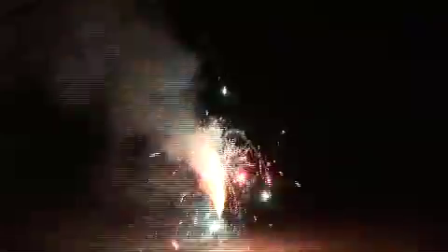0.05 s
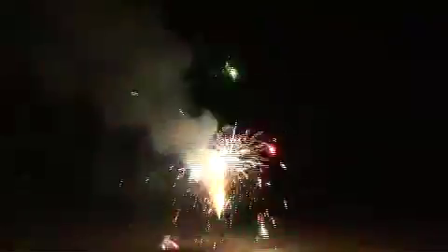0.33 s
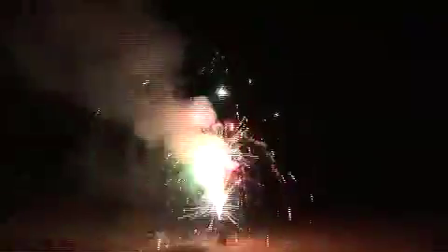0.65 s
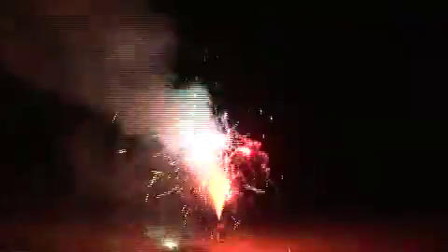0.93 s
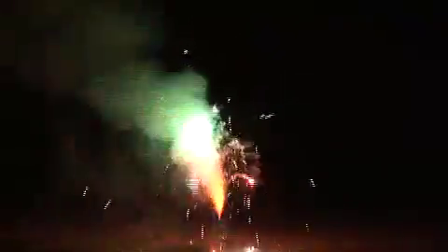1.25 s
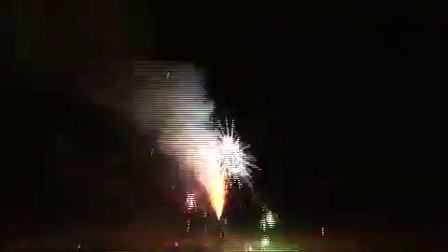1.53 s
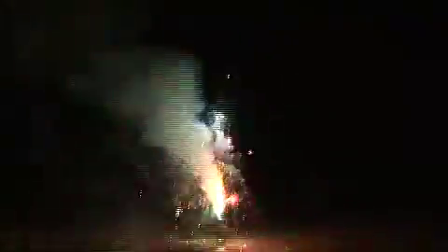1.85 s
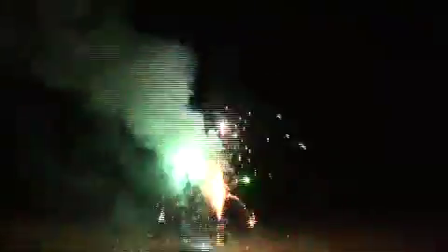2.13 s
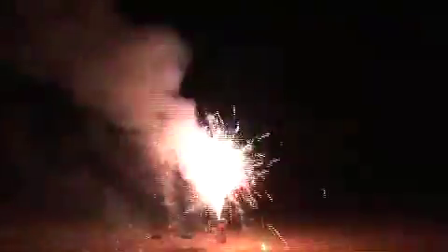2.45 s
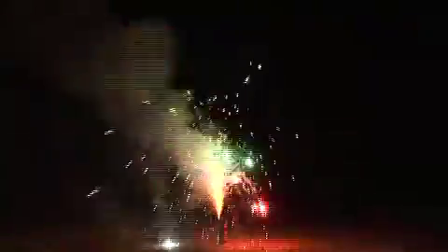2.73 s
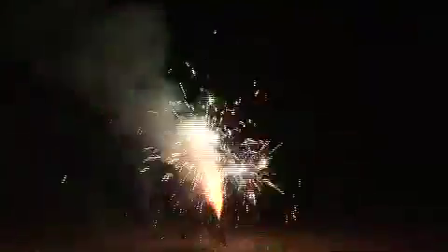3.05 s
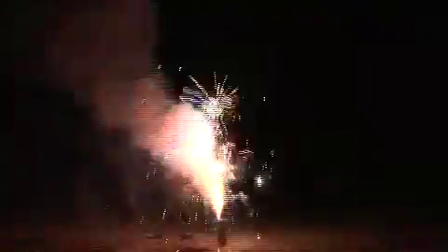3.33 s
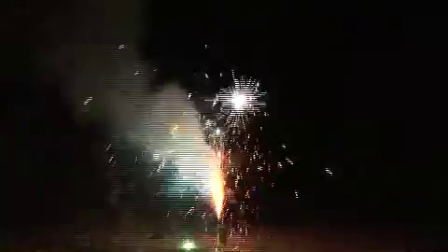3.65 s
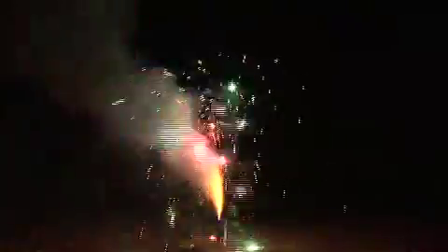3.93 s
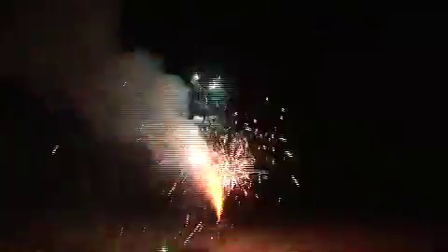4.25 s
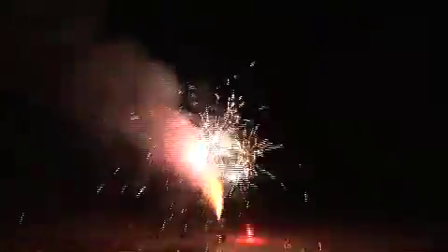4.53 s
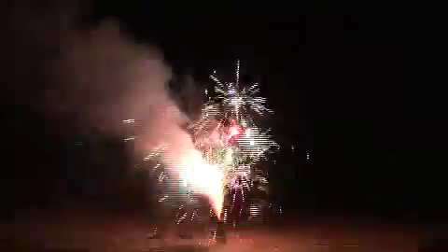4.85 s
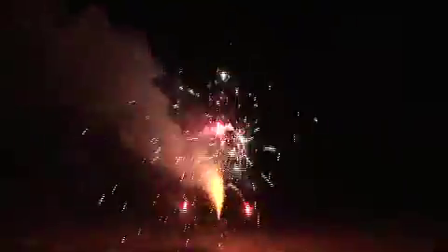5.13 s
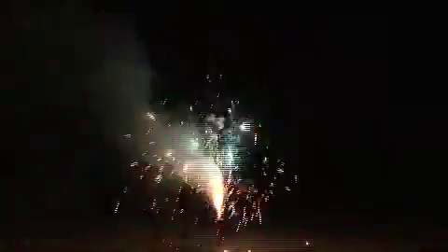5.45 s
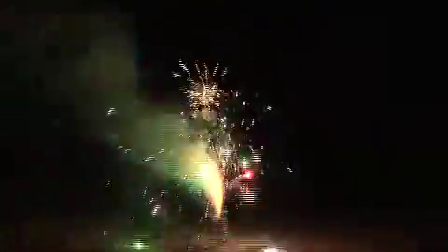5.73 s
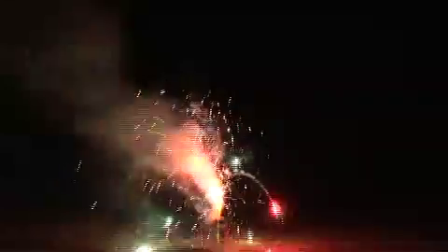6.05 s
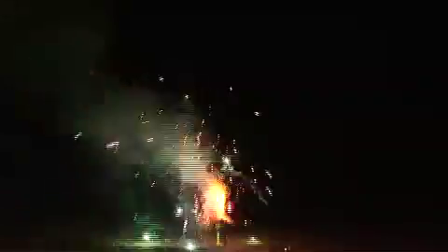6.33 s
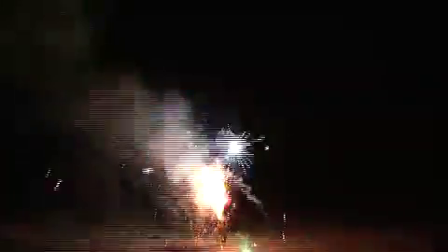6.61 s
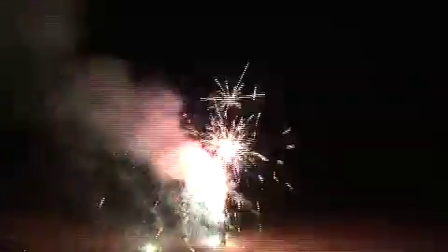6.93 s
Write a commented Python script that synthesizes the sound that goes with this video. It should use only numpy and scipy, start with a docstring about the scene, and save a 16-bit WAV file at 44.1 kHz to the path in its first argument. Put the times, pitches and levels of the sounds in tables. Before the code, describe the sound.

Dense snaps and sizzling pops spit from a hissing firework fountain outside, with a few soft thumps and a low motor hum.

```python
"""Sharp, irregular crackle over a steady hiss: a ground fountain burns outdoors at night, some metres away.
Each star thrown from the nozzle bursts as one shock and a few ms of smaller explosions,
trailed by a short bright sizzle and two faint slaps. Now and then the tube coughs out a lump
with a low thump. Underneath, a camera motor hums."""
import sys
import numpy as np
from scipy import signal
from scipy.fft import rfft, irfft
from scipy.io import wavfile
from scipy.ndimage import uniform_filter1d

SR = 44100
rng = np.random.default_rng(int(sys.argv[2]) if len(sys.argv) > 2 else 0)


def dump_mix(stems):
    """Bounce the given channels to the path in sys.argv[1] as a 16-bit WAV at rate SR."""
    frames = np.atleast_2d(stems).T  # one column per channel
    limited = np.clip(frames, -1, 1)  # hard clip at full scale
    pcm = np.round(limited * 32767).astype(np.int16)
    wavfile.write(sys.argv[1], SR, pcm)


N = 312228
TIME = np.arange(N) / SR


def stars(bright_db=1.0, half_shock_s=0.0023, crumble=1.76):
    """The lead crackle: a quick star goes off in one snap, a slow one crumbles into fragments."""
    # bursting stars: (time [s], level over 3 ms [dB], burst length [s], treble [dB])
    star_cues = [(0.0065, -29.5, 0.0017, -4), (0.042, -24.5, 0.002, 2.5), (0.066, -32, 0.0024, -7),
                 (0.1407, -23.5, 0.0039, 2), (0.2031, -23, 0.0028, 7), (0.2247, -21.5, 0.0022, -6),
                 (0.2718, -25.5, 0.0022, -2), (0.2771, -23.5, 0.0019, -7), (0.3034, -25, 0.0058, -2),
                 (0.4256, -22, 0.0029, -6), (0.4883, -32.5, 0.0019, -7), (0.504, -24.5, 0.0014, -5),
                 (0.6214, -24.5, 0.0028, -5), (0.7395, -25, 0.0028, -6), (0.7626, -19, 0.00086, 0.5),
                 (0.93, -23.5, 0.0017, -2.5), (0.9806, -23.5, 0.0014, -1.5), (1.0531, -21.0, 0.00121, 0),
                 (1.0819, -24.5, 0.0019, -26), (1.1345, -29.5, 0.0016, 5), (1.2804, -24, 0.0042, -5.5),
                 (1.6354, -21, 0.0026, 0.5), (1.766, -26.5, 0.0046, 1.5), (2.0559, -21.5, 0.0015, -2),
                 (2.0623, -21, 0.0012, -8), (2.2926, -29, 0.0053, -6), (2.3017, -27, 0.0049, 10.5),
                 (2.45, -25.5, 0.0023, 4), (2.4977, -22.5, 0.0029, 7.5), (2.505, -20, 0.0032, -7),
                 (2.5474, -19.5, 0.0013, 0.5), (2.565, -24.5, 0.0056, -17), (2.5757, -23.5, 0.0061, -2),
                 (2.6084, -24.5, 0.0022, -5), (2.6912, -17, 0.0029, 2), (2.8856, -26, 0.0045, -2),
                 (2.9888, -30.5, 0.00091, -5), (2.9952, -22.5, 0.0093, 0), (3.01, -35, 0.0034, -3),
                 (3.0283, -27, 0.0016, -2), (3.0786, -24.5, 0.0072, -4), (3.1052, -21, 0.0019, -2),
                 (3.1286, -22, 0.00089, -1), (3.3183, -29, 0.0018, -4.5), (3.3905, -31, 0.003, 1),
                 (3.4092, -30.5, 0.0038, 5), (3.4237, -23.5, 0.0041, -3), (3.438, -29, 0.0071, 2),
                 (3.4902, -25, 0.0075, -6), (3.5061, -21.5, 0.0034, -1), (3.539, -18.0, 0.0028, -4),
                 (3.5728, -31, 0.0018, -1), (3.5922, -19, 0.0018, -1), (3.638, -22, 0.0023, -1),
                 (3.649, -24, 0.0051, -3), (3.7696, -21.5, 0.0021, -6), (3.8183, -26.5, 0.0034, -2),
                 (3.8891, -24.5, 0.0017, -6), (3.9093, -18, 0.0023, 0), (4.069, -36, 0.0013, -12),
                 (4.082, -21, 0.0042, 3), (4.2149, -25.5, 0.0027, 0), (4.2258, -26, 0.0096, 0),
                 (4.24, -27, 0.0043, -0.0), (4.257, -31, 0.0021, -4), (4.2721, -23, 0.0028, 2.5),
                 (4.3438, -23, 0.0019, -3), (4.3877, -23.5, 0.0035, 6), (4.498, -20.5, 0.0034, 2.5),
                 (4.5878, -27.5, 0.0037, 1.0), (4.6092, -23, 0.0024, 0), (4.627, -21.5, 0.0033, -2),
                 (4.6566, -27, 0.004, 2), (4.701, -23, 0.0013, 0), (4.7166, -27.5, 0.0012, -4),
                 (4.7585, -26.5, 0.0012, -2.0), (4.8128, -17, 0.00419, 4), (4.9356, -21.5, 0.0044, -2.5),
                 (4.9624, -27, 0.0024, 13), (4.9748, -19.5, 0.0016, -9), (5.1043, -22.5, 0.0016, -6),
                 (5.1265, -18.5, 0.0016, -4.5), (5.1794, -24.5, 0.0036, 2), (5.3903, -19.5, 0.0009, 1),
                 (5.4079, -32, 0.002, 0.0), (5.4344, -22.5, 0.0044, 1), (5.4802, -23, 0.0046, -1.5),
                 (5.634, -27.5, 0.0062, 0), (5.6461, -26, 0.0014, 5), (5.7018, -24, 0.005, -0.5),
                 (5.8, -31.5, 0.0048, -4), (5.8087, -27, 0.0084, -5), (5.9175, -27, 0.0039, -3),
                 (5.9482, -23.5, 0.004, -2), (5.9542, -23.5, 0.0038, -1), (6.049, -28.5, 0.0043, 5),
                 (6.1014, -25.5, 0.0044, 1), (6.1727, -33, 0.002, 2), (6.2612, -23, 0.0032, -3),
                 (6.5127, -28, 0.00099, 0.5), (6.732, -21, 0.0013, -12), (6.7464, -25.5, 0.0028, 6),
                 (6.772, -26.5, 0.0017, 5), (6.814, -27.5, 0.00077, -8), (6.823, -28.5, 0.0036, -15),
                 (6.869, -25.5, 0.0028, -8), (6.9533, -18.5, 0.0012, -0.5), (7.001, -26.5, 0.0034, -6),
                 (7.0073, -22.5, 0.0031, 3), (7.0314, -30, 0.0019, 1.0), (7.0483, -25, 0.003, 2),
                 (7.0687, -22.5, 0.00332, 1), (7.0764, -27, 0.0019, -3)]
    out = np.zeros(N)
    for s, db, length, treble_db in star_cues:
        first_share = 1 / (1 + (length / half_shock_s) ** crumble)
        add(out, s, burst(db, length, first_share, treble_db + bright_db))
    return out


def burst(db, length, first_share, treble_db, shock_s=.00018, scatter_db=3.0, count=12, size=1024):
    """One crack: a first shock, then fragments explode at random moments with unequal force."""
    # tone of the shocks after their path over the ground: (frequency [Hz], gain [dB])
    crack_eq = [(120, 11.5), (300, 5.5), (600, -6), (1050, 4), (1500, -9), (2100, 2.5), (3000, 0.5),
                (4000, -1.5), (6300, -9), (9700, -1.5), (13000, -2.5), (16000, 3.5)]
    start = 2 + length * SR * np.append(0, rng.uniform(.08, 1.05, count))
    # a coarse star makes longer shocks than a fine one, so each cracks at its own pitch
    coarseness = .14 * rng.standard_normal()
    duration = shock_s * SR * np.exp(coarseness + .19 * rng.standard_normal(count + 1))
    force = undb(scatter_db * rng.exponential(size=count + 1))
    snap = level(shocks(start[:1], duration[:1], force[:1], size), 0)
    fragments = level(shocks(start[1:], duration[1:], force[1:], size), 0)
    first_share = np.clip(first_share, 0, .95)
    crack = np.sqrt(first_share) * snap + np.sqrt(1 - first_share) * fragments
    # the ground bounce lags by the height of the star and gives each its own hollow ring
    bounce_lag = int(.0005 * SR * (.5 + rng.random()))
    crack = crack + .4 * np.roll(crack, bounce_lag)
    hz = bins(size)
    middling_db, bass_hz, treble_hz = -23.5, 800, 6000
    bass = -.17 * (db - middling_db) / (1 + (hz / bass_hz) ** 2)  # louder cracks are a little leaner
    treble = treble_db / (1 + (treble_hz / (hz + 1)) ** 4)
    crack = through(crack, causal(spectrum(crack_eq, hz) + bass + treble))
    return crack * undb(db) * np.sqrt(.003 * SR / np.sum(crack ** 2))


def shocks(start, duration, force, size):
    """N-shaped pressure waves: a sudden push, a straight fall into suction, a sudden end."""
    age = np.arange(size) - start[:, None]  # all times in samples
    span = duration[:, None]
    gate = np.clip(age + 1, 0, 1) * np.clip(span - age + 1, 0, 1)
    return force @ ((1 - 2 * age / span) * gate)


def sparks(trim_db=-1, faint_db=-46, length=0.00253, first_share=0.71, treble_db=-4, count=45):
    """Small sparks spit throughout, fainter and softer than the stars; most sink into the hiss."""
    # sparks that stand out: (time [s], level before trim and EQ [dB])
    spark_cues = [(0.243, -40), (0.748, -37), (0.883, -37.5), (1.151, -37), (1.506, -35.5), (3.1726, -31.5),
                  (3.681, -33.5), (4.741, -36), (5.14, -37), (5.461, -33), (5.552, -38), (6.4278, -36),
                  (6.592, -36.5), (6.646, -35), (6.806, -34), (6.979, -41)]
    # soft tone of the sparks: (frequency [Hz], gain [dB])
    spark_eq = [(500, -5), (2000, -4), (3500, 5), (6000, -15), (12000, -12)]
    out = np.zeros(N)
    for s, db in spark_cues:
        add(out, s, burst(db + trim_db, length, first_share, treble_db))
    for when, force, span in rng.random((count, 3)):
        spit = burst(faint_db, length * (.5 + span), first_share, treble_db)
        add(out, when * N / SR, (.5 + force) * spit)
    return colour(out, spark_eq)


def echoes(crackle, body_db=-8, edge_hz=6000):
    """Small hard surfaces nearby slap each crack back, mostly its treble."""
    # slapbacks: (delay [s], treble level [dB])
    slaps = [(0.0321, -19), (0.0575, -20.5)]
    out = np.zeros(N)
    low_shelf = causal(body_db / (1 + (bins(size=256) / edge_hz) ** 4))
    bright = through(crackle, low_shelf)
    for delay_s, db in slaps:
        add(out, delay_s, undb(db) * bright)
    return out


def sizzle(crackle, attack_s=0.00094, grain_db=3.0, flicker_db=3.5, split_hz=7000, size=22050):
    """Glowing dust sizzles out after each burst, following its force and brightness."""
    # tone of the sizzle: (frequency [Hz], gain [dB])
    sizzle_eq = [(130, -24), (300, -2), (600, -2.5), (1200, -1.5), (1700, 2.5), (2600, 4), (4000, 0),
                 (7000, -13), (11000, -4), (16000, -6.5)]
    t = np.arange(size) / SR
    fade = 0
    for db, t60 in ((-15, 0.04), (-11, 0.3)):  # a quick spray and a slower tail
        power = (undb(-60 * t / t60) * (1 - np.exp(-t / attack_s))) ** 2
        fade = fade + undb(db) ** 2 * power / power.sum()
    grains = rng.standard_normal(N) * undb(grain_db * walk(5000) + flicker_db * walk(200))
    grains = level(colour(grains, sizzle_eq), 0)
    out = 0
    for side in ("lowpass", "highpass"):
        band = signal.butter(4, split_hz, side, fs=SR, output="sos")
        force = level(signal.sosfilt(band, crackle), 0) * np.std(crackle)
        envelope = np.sqrt(np.abs(through(force ** 2, fade)))
        out = out + envelope * signal.sosfilt(band, grains)
    return out


def coughs(rise_s=0.00016, detune=0.11, tail_db=-11, tail_t60=0.32, size=8192):
    """A lump leaves the nozzle and the cardboard tube rings: a short push knocks, a long one thumps."""
    # coughs of the tube: (time [s], dry peak [dB], decay of the push [s])
    cough_cues = [(0.7629, -27, .0002), (1.0452, -24, .0006), (1.052, -27, .001), (1.7116, -29.5, .0003),
                  (1.7177, -23.5, 0.001), (1.995, -17, 0.00025), (1.9971, -23.5, 0.00012),
                  (2.0005, -24, .001), (5.64, -31, .0001)]
    # tube resonances: (centre frequency [Hz], relative level [dB], t60 [s])
    tube_modes = [(62.4, -18, 0.18), (179, 2.5, 0.025), (298, -3.5, 0.079), (417, -3, 0.035),
                  (744, -1.5, 0.028), (1300, -17, 0.015)]
    t = np.arange(size) / SR
    out = np.zeros(N)
    for s, peak_db, push_s in cough_cues:
        tunings = 1 + detune * rng.standard_normal(len(tube_modes))
        ring = sum(undb(db - 60 * t / t60) * np.cos(2 * np.pi * hz * tuning * t)
                   for (hz, db, t60), tuning in zip(tube_modes, tunings))
        push = np.exp(-t / push_s) * (1 - np.exp(-t / rise_s))
        thump = through(ring, push)
        add(out, s, thump * undb(peak_db) / np.abs(thump).max())
    # the surroundings scatter a short tail back
    scatter = rng.standard_normal(size) * undb(-60 * t / tail_t60)
    return out + undb(tail_db) * through(out, scatter / np.linalg.norm(scatter))


def jet(trim_db=-1, flutter_db=0.1, grit_db=0.94):
    """The bed of hiss: gas rushes from the nozzle, fluttering as the powder burns grain by grain."""
    # tone of the gas jet: (frequency [Hz], gain [dB])
    jet_eq = [(400, -9.5), (600, -4.5), (900, -4.5), (1500, 0), (2400, 0), (3400, 2.5), (4100, -2.5),
              (5600, -17), (6600, -24.5), (8500, -23.5), (11000, -21.5), (15500, -26)]
    # swell and ebb of the jet: (time [s], level before trim [dB])
    burn_levels = [(0.0, -46.5), (0.27, -43.5), (0.6, -48.5), (1.0, -47.5), (1.4, -48.5), (1.65, -47),
                   (1.9, -48), (2.1, -45.5), (2.4, -47), (3.2, -47), (3.6, -43), (3.97, -44.5), (4.48, -48),
                   (4.75, -45.5), (5.4, -46.5), (6.35, -50.5), (6.85, -45.5), (7.08, -45.5)]
    gas = rng.standard_normal(N) * undb(flutter_db * walk(25) + grit_db * walk(900))
    return level(colour(gas, jet_eq), trim_db) * undb(curve(burn_levels))


def motor(hum_db, rumble_db, turn_hz=31.195, drift_hz=.08, waver_db=0.85):
    """A small camera motor hums, strongest at twice its turn rate, over a soft rumble."""
    # hum partials: (multiple of the turn rate, relative level [dB])
    partials = [(1, -13.5), (2, 2.5), (3, -19.5), (4, -14), (5, -15.5), (6, 0), (7, -9), (8, -7.5),
                (9, -17), (10, -16), (11, -24)]
    # rumble of the camera body: (frequency [Hz], gain [dB])
    rumble_eq = [(22, -27), (50, -1), (100, -1), (190, 1), (235, -9), (320, -6.5), (360, -9), (490, -14),
                 (650, -18.5), (1500, -34.5)]
    turns = np.cumsum(turn_hz + drift_hz * walk(2.5)) / SR
    hum = sum(undb(db + waver_db * walk(3.5)) * np.sin(2 * np.pi * (k * turns + rng.random()))
              for k, db in partials)
    rumble = colour(rng.standard_normal(N), rumble_eq)
    return level(hum, hum_db) + level(rumble, rumble_db)


def undb(db):
    """Decibels to gain."""
    return 10 ** (np.asarray(db) / 20)


def level(x, db):
    """Scale to an rms level."""
    return x * undb(db) / np.sqrt(np.mean(x ** 2))


def curve(rows):
    """Join (time [s], value) rows by straight lines."""
    return np.interp(TIME, *np.transpose(rows))


def spectrum(points, hz):
    """Join (frequency [Hz], gain [dB]) points on a log-frequency axis."""
    f, db = np.transpose(points)
    return np.interp(np.log(hz + 1), np.log(f), db)


def bins(size):
    """Frequencies of a real transform."""
    return np.arange(size // 2 + 1) * SR / size


def causal(db):
    """The minimum-phase impulse response with this gain per bin."""
    cepstrum = irfft(np.log(undb(db)))
    half = len(cepstrum) // 2
    cepstrum[1:half] *= 2
    cepstrum[half + 1:] = 0
    return irfft(np.exp(rfft(cepstrum)))


def colour(x, points):
    """EQ a sound with (frequency [Hz], gain [dB]) points."""
    return irfft(rfft(x) * undb(spectrum(points, bins(len(x)))), len(x))


def through(x, response):
    """Pass a sound through an impulse response."""
    return signal.fftconvolve(x, response)[:len(x)]


def walk(rate):
    """Random values held for 1 / rate seconds and smoothed twice; rms 1."""
    hold = int(SR / rate)
    held = np.repeat(rng.standard_normal(N // hold + 1), hold)
    return level(uniform_filter1d(uniform_filter1d(held, hold), hold)[:N], 0)


def add(out, s, sound):
    """Mix a sound in at s seconds."""
    i = int(np.clip(round(s * SR), 0, N - 1))
    out[i:i + len(sound)] += sound[:N - i]


def scene():
    """The mono mix: crackling fountain in front, motor hum beneath."""
    crackle = stars() + sparks()
    fountain = crackle + echoes(crackle) + sizzle(crackle) + coughs() + jet()
    return (fountain + motor(hum_db=-39.5, rumble_db=-50.5))[None]


def record(dry, top_hz=15900):
    """The microphone housing colours everything; a steep low-pass cuts the top."""
    # housing resonances and notches: (frequency [Hz], width [Hz], gain [dB])
    housing_eq = [(1267, 330, 4.5), (1800, 145, -3), (4565, 370, -13.5), (4950, 690, 7.5),
                  (7455, 930, -8.5), (11240, 420, -2.5), (12750, 1560, 5.5), (14100, 530, -3.5)]
    hz = bins(size=2048)
    housing = causal(sum(db / (1 + (2 * (hz - f) / width) ** 2) for f, width, db in housing_eq))
    high_cut = signal.ellip(8, .2, 70, top_hz, fs=SR, output="sos")
    return signal.sosfilt(high_cut, through(dry[0], housing))[None]


dry = scene()
out = record(dry)
dump_mix(out)
```